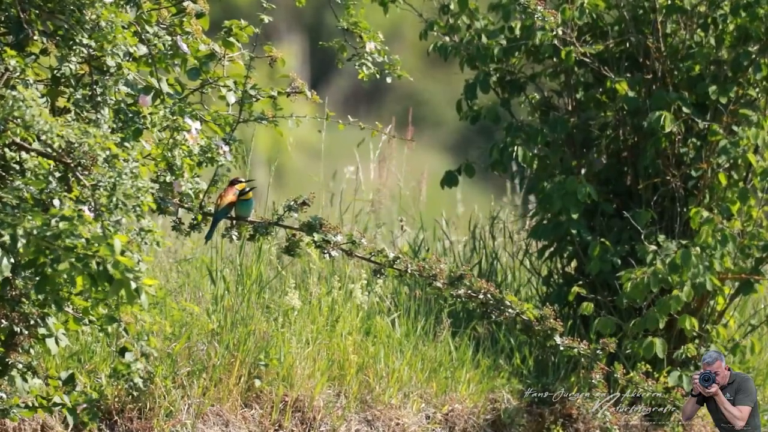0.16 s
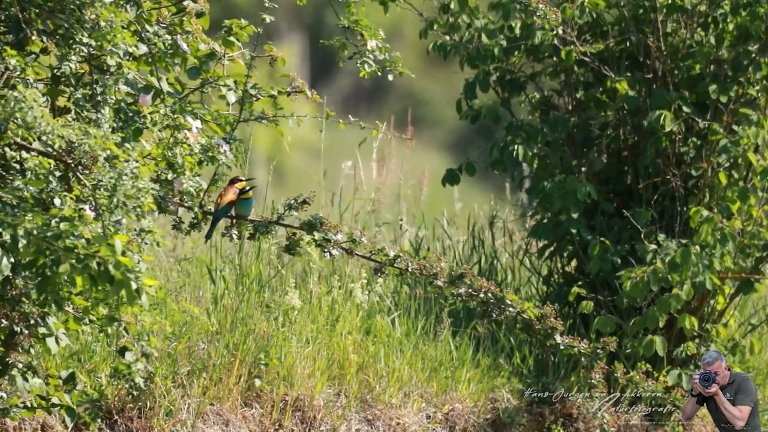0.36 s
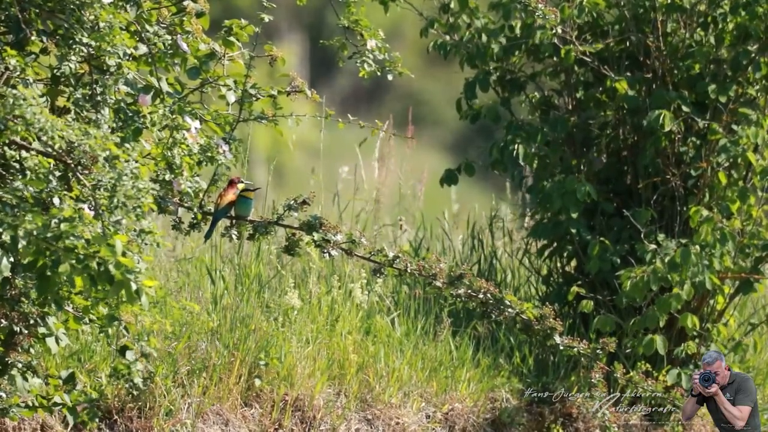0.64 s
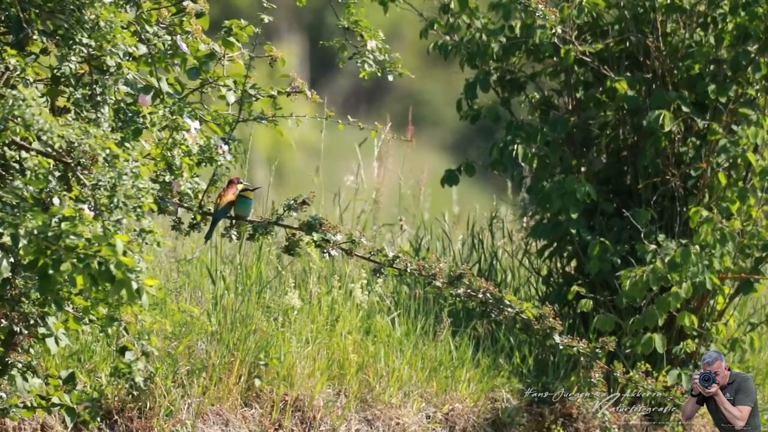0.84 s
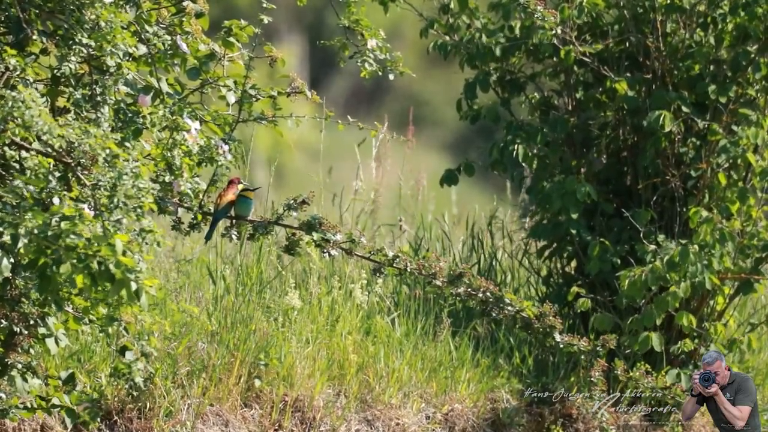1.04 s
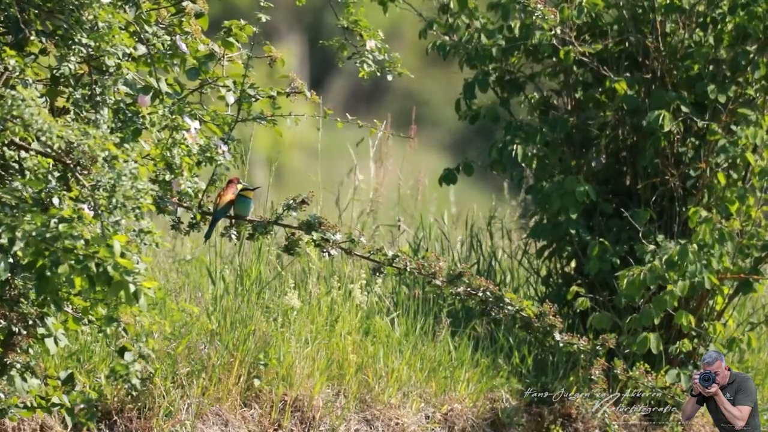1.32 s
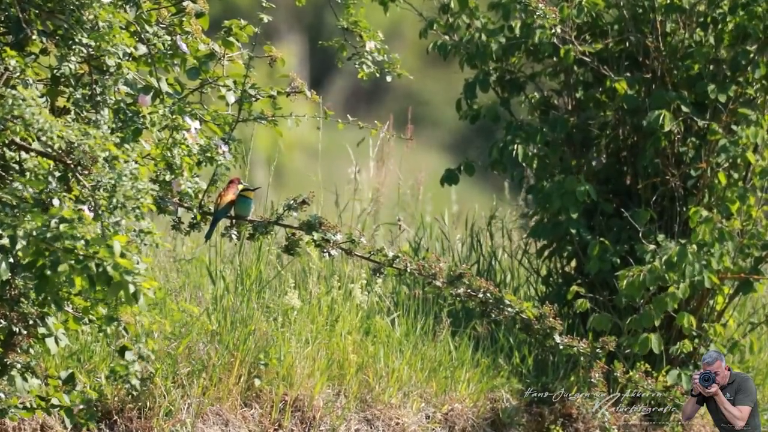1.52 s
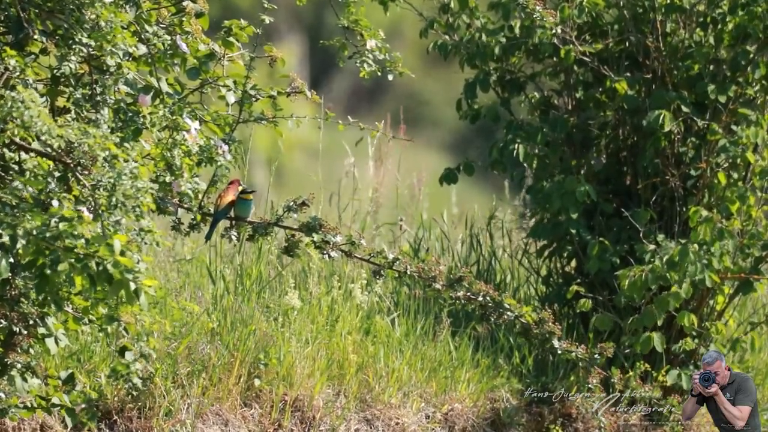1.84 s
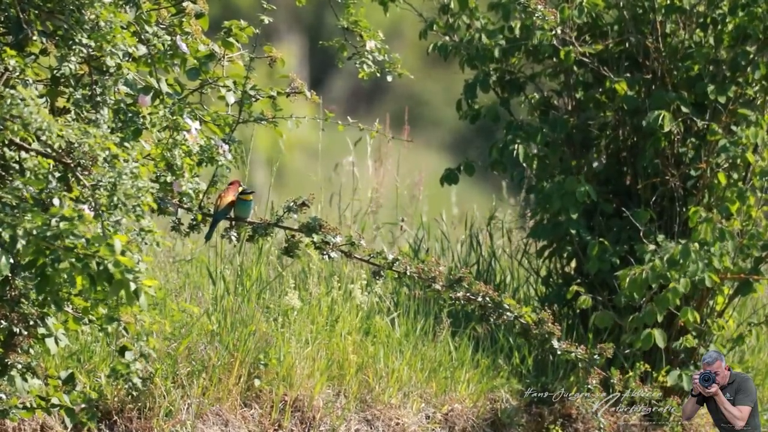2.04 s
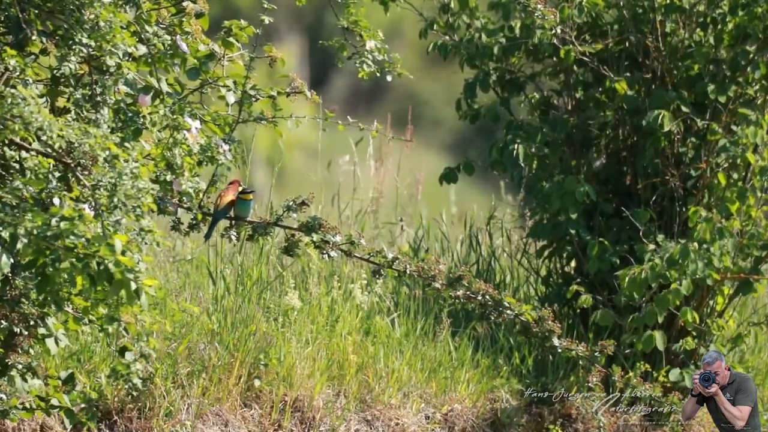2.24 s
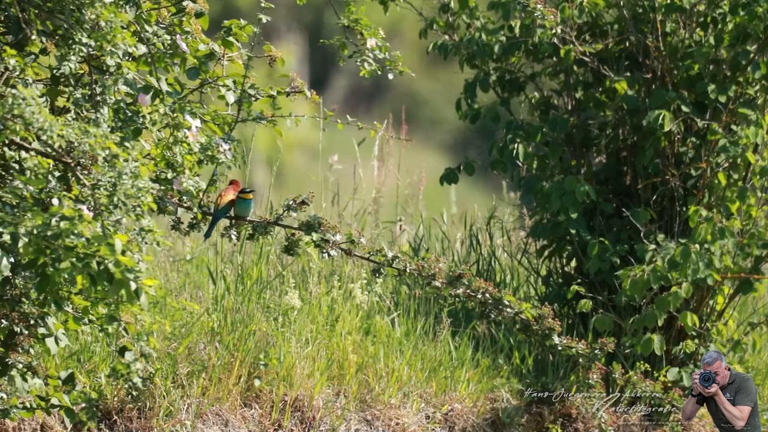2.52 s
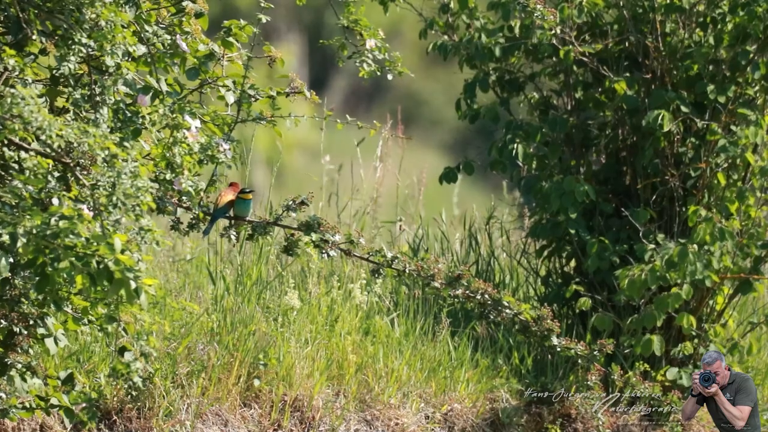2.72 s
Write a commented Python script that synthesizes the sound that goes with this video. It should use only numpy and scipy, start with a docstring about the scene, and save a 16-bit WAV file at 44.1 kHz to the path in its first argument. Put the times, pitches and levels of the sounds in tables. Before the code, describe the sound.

Bee-eaters call from a hedge, each a soft rough pip, click and short drooping whistle, near and far; small songbirds chirp faintly behind, over low wind and distant traffic rumble, in open-air stereo.

```python
"""Bee-eaters call from a hedge in a meadow: a rough, soft pip, a click, then a short whistle that sags in pitch.
Near and far birds are near-sine tones with overtones, shaken by uneven airflow and thrown back by the bushes.
A small songbird warbles twice and another whistles once, both drawn as pitch and level curves; chirps lie far off.
Wind and far traffic rumble underneath as shaped noise with wavering hums, heard by a spaced pair of microphones."""
import sys
import numpy as np
from scipy import signal
from scipy.fft import rfft, irfft
from scipy.io import wavfile
from scipy.ndimage import uniform_filter1d

SR = 44100
rng = np.random.default_rng(int(sys.argv[2]) if len(sys.argv) > 2 else 0)


def master(y):
    """Save y as 16-bit WAV."""
    cut = np.clip(np.atleast_2d(y).T, -1, 1)
    pcm = np.round(cut * 32767)  # scale
    wavfile.write(sys.argv[1], SR, pcm.astype(np.int16))


def linear_from_db(decibels):
    """Turn decibels (scalar or array-like) into linear amplitude factors; 0 gives 1."""
    return 10 ** (np.asarray(decibels, float) / 20)


N = 126567  # length in samples

# rumble shape, alike in both microphones: (f/Hz, relative level/dB)
AIR_ALIKE = [(12, -25), (20, -4), (52, 2.5), (81, -5), (133, -11), (157, -22), (191, -11.5), (219, -32),
             (274, -22.5), (453, -36), (632, -31), (768, -40.5), (908, -38), (1380, -36.5), (2090, -45),
             (3090, -40), (4440, -48), (8430, -52.5), (15600, -78.5)]
# wind rumble with a faint hiss above, opposite in the two microphones: (f/Hz, relative level/dB)
AIR_OPPOSITE = [(12, 10.5), (20, 4.5), (64, -2), (232, -13.5), (274, -13.5), (307, -22), (859, -14),
                (1540, -12), (1720, -6.5), (2150, -13), (3090, -18.5), (12500, -37), (15600, -57)]
# hums wavering in the rumble: (f/Hz, width/Hz, level/dB)
HUMS = [(57.4, 15, -58), (184.6, 60, -75), (274.3, 43, -74), (518.4, 44, -83.5), (641, 24, -82),
        (880, 56, -82.5)]
# faint far chirps: (t/s, level/dB, start f/Hz, end f/Hz, length/s)
CHIRPS = [(0.053, -86, 6300, 4450, 0.018), (0.084, -83, 3800, 3860, 0.024),
          (0.214, -83.5, 3680, 4190, 0.03), (0.992, -88, 3530, 3520, 0.036),
          (1.202, -94, 3640, 3500, 0.022), (1.403, -82.5, 3605, 3610, 0.039),
          (1.523, -86, 3750, 3860, 0.02), (1.527, -80.5, 3060, 3060, 0.021),
          (1.597, -81.5, 3600, 3370, 0.053), (1.633, -80, 2740, 3430, 0.011),
          (1.658, -94, 3900, 3810, 0.032), (1.675, -75.5, 4160, 2520, 0.013),
          (1.708, -96, 3180, 3060, 0.012), (1.825, -84, 3080, 3000, 0.05), (1.908, -82, 2800, 2660, 0.018),
          (2.007, -79.5, 1248, 1425, 0.045), (2.048, -73.5, 3730, 3750, 0.019),
          (2.065, -75.5, 3080, 3056, 0.035)]
# falling whistle of another bird: (t/s, f/Hz, level/dB before the lift in the mix)
FALLING_WHISTLE = [(0.62, 1970, -64), (0.644, 1910, -64), (0.652, 1796, -71), (0.661, 1630, -64.5),
                   (0.683, 1684, -62.5), (0.722, 1720, -66), (0.731, 1500, -62), (0.741, 1280, -65),
                   (0.755, 1300, -66.5)]
# its partials: (multiple of f, level/dB, level gained by the end/dB)
FALLING_PARTIALS = [(1, 0, -2), (2, -5.5, -46), (3, -13, -58)]
# warble phrases: (t/s, level/dB, left over right level/dB)
PHRASES = [(.631, -57, -5.5), (1.981, -60, -4)]
# notes of one phrase, each a list of (t/s in the phrase, f/Hz before slight flattening, level/dB in the phrase)
WARBLE = [
    [(0, 4030, -14), (.008, 5600, -13.5), (.024, 6100, -1.5), (.029, 5930, -4), (.034, 4940, -3),
     (.047, 4570, -6), (.057, 3620, -10.5)],
    [(.004, 5700, -13), (.012, 6400, 1), (.026, 6980, -12)],
    [(.064, 4660, -25), (.071, 5670, -0.5), (.075, 6300, 1.5), (.08, 5350, -22), (.092, 5900, -19)],
    [(.076, 5240, -10), (.082, 4800, -8), (.088, 4300, -22)],
    [(.097, 3100, -19), (.103, 3510, -7.5), (.107, 3800, -3.5), (.113, 4050, 3.5), (.116, 4300, -19),
     (.12, 4750, -8), (.133, 4880, -10)],
]
# near calls: (t/s of the whistle, level/dB, left over right level/dB, end f/Hz, brightness/dB per overtone)
NEAR_CALLS = [(.1605, -39.5, -3.5, 2096, 1), (.492, -39.5, -8, 2094, 1), (.7655, -37.5, -7, 2213, 2.5),
              (1.052, -36, -6, 2058, -2), (2.1735, -38.5, 4.5, 1999, 1), (2.327, -35, 5, 2222, 1),
              (2.7135, -36.5, 4, 1854, 2)]
# far calls: (t/s of the whistle, level/dB, left over right level/dB, end f/Hz, brightness/dB per overtone)
FAR_CALLS = [(.0768, -58.5, -7, 2160, -18), (.1385, -51.5, -5, 2223, 1), (.2678, -56.5, -3, 2127, -13),
             (.8635, -61, -6, 2136, -3.5), (1.4468, -58, -8.5, 2097, -13), (1.8245, -58.5, 0, 2023, 1),
             (1.962, -59.5, 6, 2143, -8), (2.6172, -62, 0, 1920, -8)]
# partials of the pip: (multiple of f, level/dB, level gained by the end/dB)
PIP_PARTIALS = [(1, 0, -3), (1.5, -13, 0), (2, -12, -2), (3, -20, 0), (4, -28, 0)]
# overtones of the call whistle: (multiple of f, level/dB before brightness, level gained by the end/dB)
CALL_OVERTONES = [(2, -22.5, -1), (3, -28.5, -12), (4, -43.5, -3), (5, -71.5, -16.5), (6, -46.5, -13.5)]

PIP_LEAD_S = 0.0158  # the pip starts this long before the whistle


def times(length):
    """Sample times in seconds."""
    return np.arange(int(length * SR)) / SR


def coloured(gain):
    """Noise with the given gain over frequency, rms 1."""
    size = N + N % 2
    spectrum = rfft(rng.standard_normal(size)) * gain(np.fft.rfftfreq(size, 1 / SR) + 1)
    x = irfft(spectrum)[:N]
    return x / np.sqrt(np.mean(x ** 2))


def air():
    """Wind and far traffic: rumble and hums alike in both microphones, fainter rumble opposite, gusts over all."""
    def shape(rows):
        hz, db = np.array(rows).T
        return lambda f: linear_from_db(np.interp(np.log(f), np.log(hz), db))

    alike = linear_from_db(-52) * coloured(shape(AIR_ALIKE))
    for hz, width, db in HUMS:
        alike = alike + linear_from_db(db) * coloured(lambda f: 1 / (1 + (2 * (f - hz) / width) ** 2))
    opposite = linear_from_db(-69) * coloured(shape(AIR_OPPOSITE))
    gust_db = 0.45 * coloured(lambda f: 1 / (1 + (f / 5.4) ** 2))  # slow swells and ebbs, 0.45 dB rms
    return linear_from_db(gust_db) * np.array([alike + opposite, alike - opposite])


def bush_returns():
    """Scatter from the hedge: noise that swells in, dies off at the hedge's depth and leaves a faint long tail."""
    swell_s, t60_s, depth_s, treble_loss_hz = 0.0096, 0.18, 0.052, 3500
    long_t60_s, long_db = 0.45, -30
    unlike = 0.5  # opposite part against the part alike in the two microphones
    t = times(0.45)
    hedge = np.exp(-np.log(1000) * t / t60_s - (t / depth_s) ** 4)
    long_tail = linear_from_db(long_db) * np.exp(-np.log(1000) * t / long_t60_s)
    common, opposite = rng.standard_normal((2, len(t)))
    tail = common + unlike * opposite * np.array([[1], [-1]])
    tail = tail * (hedge + long_tail) * np.clip(t / swell_s, 0, 1) ** 2
    tail = tail / np.sqrt(np.sum(tail ** 2) / 2)
    return signal.lfilter(*signal.butter(1, treble_loss_hz, fs=SR), tail)


def add(out, x, at, db, pan_db, wet_db, lag=0.):
    """Places a sound with its bush returns; pan_db is left over right, lag the seconds left hears it later."""
    tail = bush_returns()
    for c, side in enumerate((1, -1)):
        y = linear_from_db(wet_db) * signal.fftconvolve(x, tail[c])
        y[:len(x)] += x * linear_from_db(side * pan_db / 2)
        i = int(round((at + side * lag / 2) * SR))
        y = y[:N - i]
        out[c, i:i + len(y)] += linear_from_db(db) * y


def flutter(size, rough, hz=260):
    """Uneven airflow: a gain wavering around 1 by rough (rms), at rates up to about hz."""
    low_pass = signal.butter(3, hz, fs=SR, output="sos")
    waver = signal.sosfilt(low_pass, rng.standard_normal(8192))
    return 1 + rough * (waver / waver.std())[-size:]


def voice(hz, db, partials, attack=0.001, release=0.00098):
    """A syrinx tone: sine partials on one pitch curve, opened and closed smoothly (seconds)."""
    t = np.arange(len(hz)) / SR
    phase = 2 * np.pi * np.cumsum(hz) / SR
    opening = np.sin(np.pi / 2 * np.clip(t / attack, 0, 1))
    closing = np.sin(np.pi / 2 * np.clip((t[-1] - t) / release, 0, 1))
    tone = sum(linear_from_db(g + grow * t / t[-1]) * np.sin(k * phase) for k, g, grow in partials)
    return opening * closing * linear_from_db(db) * tone


def note(rows, partials, rough=0):
    """A syrinx tone that glides along rows of time, pitch and level."""
    s, hz, db = np.array(rows).T
    t = s[0] + times(s[-1] - s[0])

    def soft(values):  # rounds the corners over about a millisecond
        return uniform_filter1d(np.interp(t, s, values), size=50, mode="nearest")

    return flutter(len(t), rough) * voice(soft(hz), soft(db), partials)


def far_chirps(out):
    """Short straight glides of rough tone, with more bush returns than direct sound."""
    for s, db, start_hz, end_hz, length in CHIRPS:
        chirp = note([(0, start_hz, 0), (length, end_hz, 0)], [(1, 0.0033, 0)], rough=0.6)
        add(out, chirp, s, db, pan_db=0, wet_db=8)


def falling_whistle(out):
    """A smooth tone falling in steps, whose overtones fade away as it falls."""
    whistle = note(FALLING_WHISTLE, FALLING_PARTIALS)
    add(out, whistle, FALLING_WHISTLE[0][0], db=3, pan_db=1, wet_db=-9, lag=0.0002)


def warble(out):
    """A small songbird: quick overlapping glides of one near-pure, roughened partial."""
    partial = [(0.99, 0.0034, 0.039)]  # sung 1 % below the drawn pitch
    for s, db, pan_db in PHRASES:
        for rows in WARBLE:
            sung = note(rows, partial, rough=0.35)
            add(out, sung, s + rows[0][0], db, pan_db, wet_db=-3, lag=0.00005)


RASP_HZ = 700  # pip and click waver faster than the whistle
CALL_ROUGH = 0.22


def pip():
    """A rough rising tone that opens quickly and closes slowly."""
    length, start_hz, rise_hz = 0.0098, 2044, 203
    t = times(length)
    hz = start_hz + rise_hz * (t / length) ** 2
    return flutter(len(t), 0.7, RASP_HZ) * voice(hz, -17.5, PIP_PARTIALS, 0.0011, 0.0051)


def click(t, far):
    """A decaying ring that opens the whistle, standing out a little more in far birds."""
    hz, t60_s, level_db = 2900, 0.016, -9 + far * 1
    ring = np.sin(2 * np.pi * hz * t) * np.exp(-np.log(1000) * t / t60_s)
    ring = ring * np.clip(t / 0.0009, 0, 1)
    return linear_from_db(level_db) * ring * flutter(len(t), CALL_ROUGH, RASP_HZ)


def bee_eater(end_hz, bright_db, far):
    """Pip, pause, click and a whistle that drops onto a hold and sags; returns this and its overtones."""
    settle_s, sag_power, fade_db = 0.0015, 2.4, -5  # the level fades while the pitch sags
    throat_hz, throat_width_hz = 2350, 330  # resonance on which the whistle is loudest
    attack_s, release_s = (0.0008 if far else 0.0021), 0.0039
    click_lead_s = 0.0008
    low_cut_hz = 1930  # the small throat carries little deeper
    hold_hz, onset_hz = (end_hz + 173, 746) if far else (2348, 370)  # onset lies above the hold

    # deeper sags last longer, far whistles 1 ms more
    length = 0.014 + far * 0.001 + 0.038 * (hold_hz - end_hz) / 1000
    t = times(length)
    sag = (t / length) ** sag_power
    hz = hold_hz + onset_hz * np.exp(-t / settle_s) + (end_hz - hold_hz) * sag
    throat_db = -10 * np.log10(1 + (2 * (hz - throat_hz) / throat_width_hz) ** 2)
    level_db = throat_db / (1 + 3 * far) + fade_db * sag  # far birds show less of the resonance
    whistle = voice(hz, level_db, [(1, 0, 0.0098)], attack_s, release_s)
    partials = [(k, g + bright_db * (k - 1), grow) for k, g, grow in CALL_OVERTONES]
    overtones = voice(hz, 0, partials, 0.0046, 2 * release_s)

    out = np.zeros((2, SR // 10))
    first = pip()
    out[0, :len(first)] = first
    j = int((PIP_LEAD_S - click_lead_s) * SR)
    out[0, j:j + len(t)] += click(t, far)
    i = int(PIP_LEAD_S * SR)
    out[0, i:i + len(t)] += flutter(len(t), CALL_ROUGH) * whistle
    out[1, i:i + len(t)] = flutter(len(t), CALL_ROUGH) * overtones
    return signal.sosfilt(signal.butter(6, low_cut_hz, "high", fs=SR, output="sos"), out)


def bee_eater_calls(out, calls, far, wet_db, lag):
    """Places calls in the hedge; leaves return less of the overtones, which keep one stereo place."""
    for s, db, pan_db, end_hz, bright_db in calls:
        call, overtones = bee_eater(end_hz, bright_db, far)
        add(out, call, s - PIP_LEAD_S, db, pan_db, wet_db, lag)
        add(out, overtones, s - PIP_LEAD_S, db, -3.5, wet_db - 4, lag)


def scene():
    """The meadow, layered from the air up to the near bee-eaters."""
    out = air()
    far_chirps(out)
    falling_whistle(out)
    warble(out)
    bee_eater_calls(out, FAR_CALLS, True, wet_db=-0.5, lag=0.000135)
    bee_eater_calls(out, NEAR_CALLS, False, wet_db=-2.5, lag=0.00002)
    return out


def top_cut(x):
    """Nothing passes above the cut-off."""
    return signal.sosfilt(signal.butter(12, 15710, fs=SR, output="sos"), x)


def record(dry):
    """Delivers the finished mix of the two microphones."""
    return top_cut(dry)


dry = scene()
out = record(dry)
master(out)
```